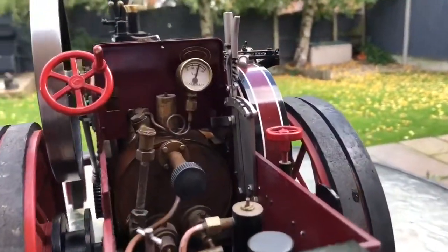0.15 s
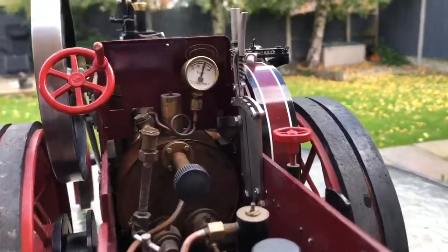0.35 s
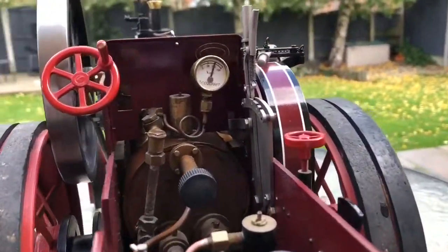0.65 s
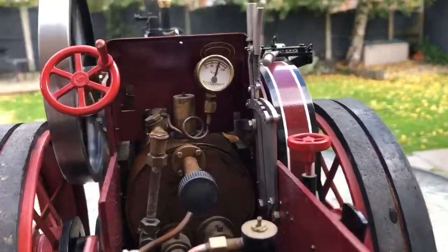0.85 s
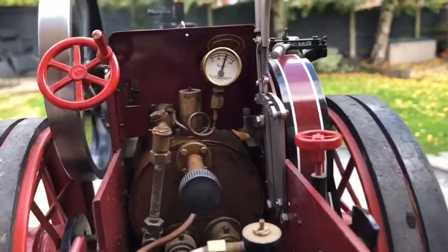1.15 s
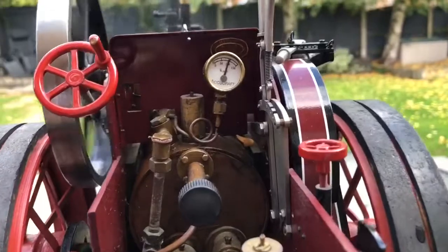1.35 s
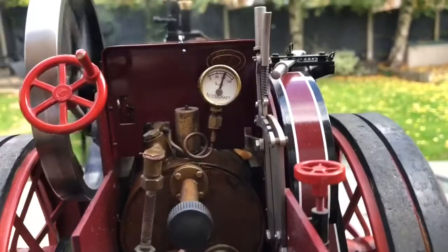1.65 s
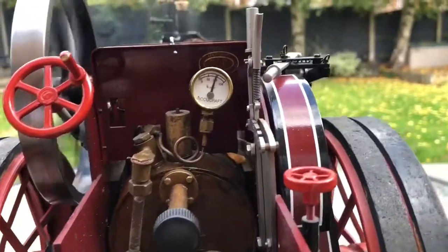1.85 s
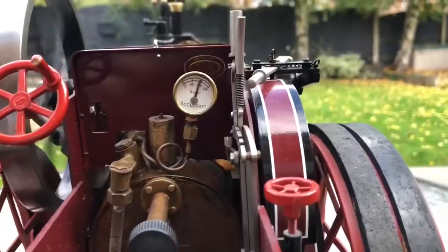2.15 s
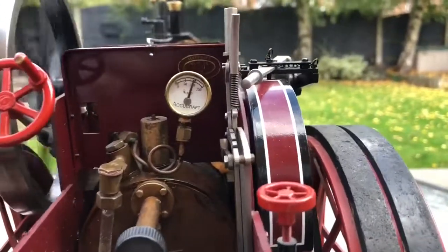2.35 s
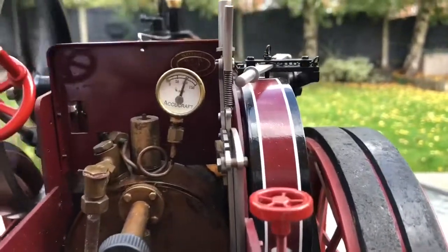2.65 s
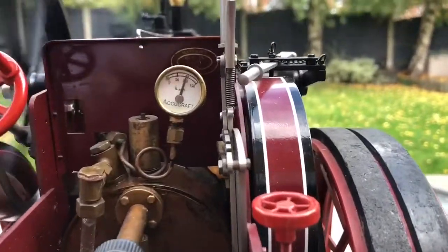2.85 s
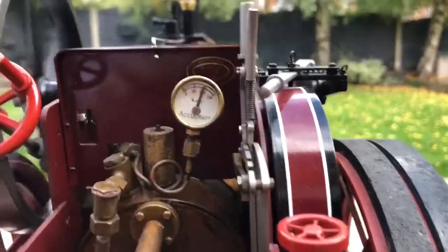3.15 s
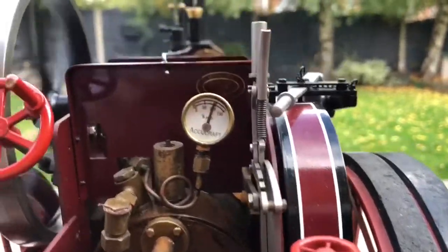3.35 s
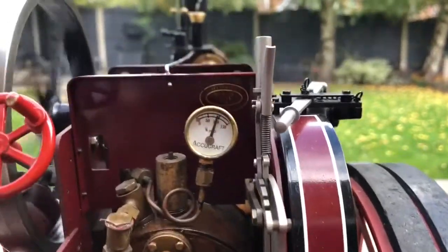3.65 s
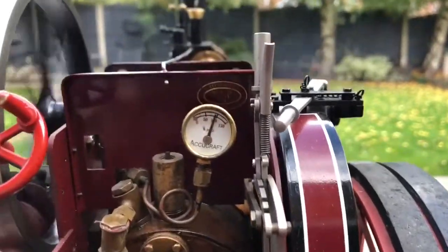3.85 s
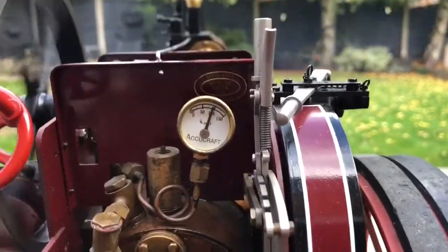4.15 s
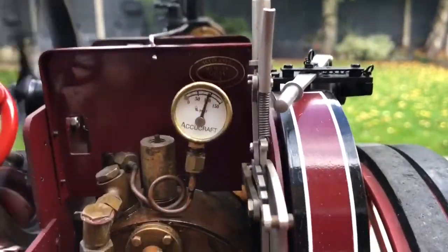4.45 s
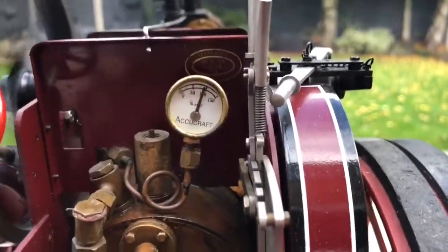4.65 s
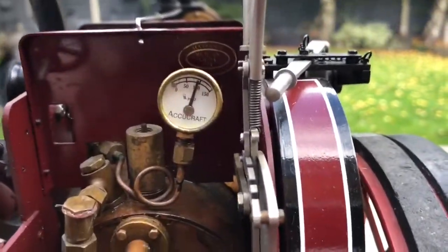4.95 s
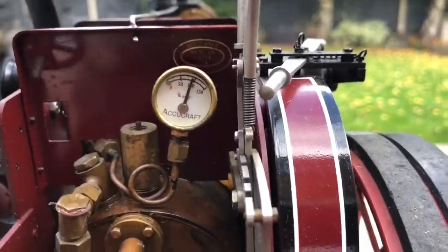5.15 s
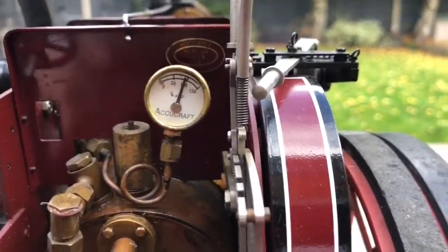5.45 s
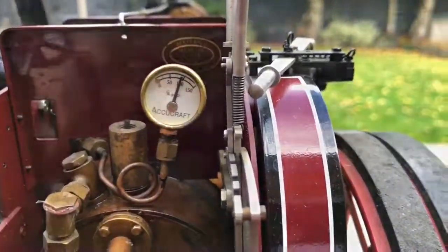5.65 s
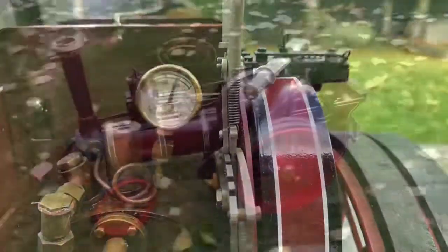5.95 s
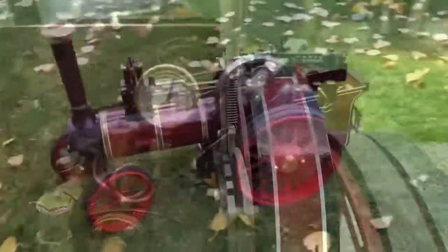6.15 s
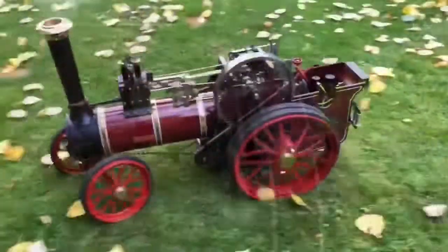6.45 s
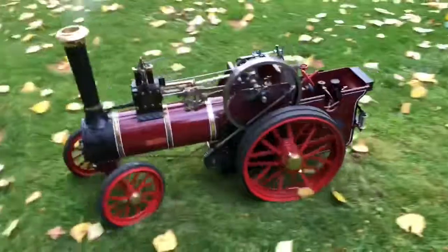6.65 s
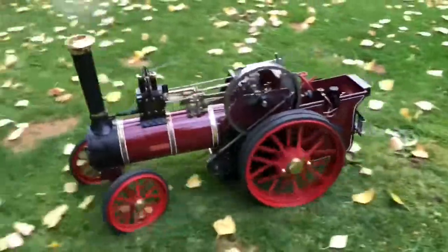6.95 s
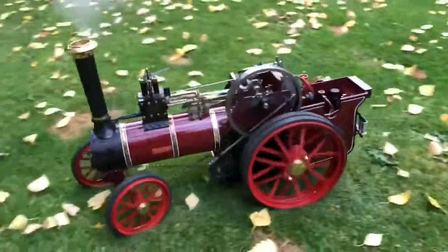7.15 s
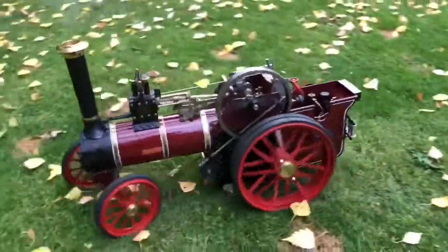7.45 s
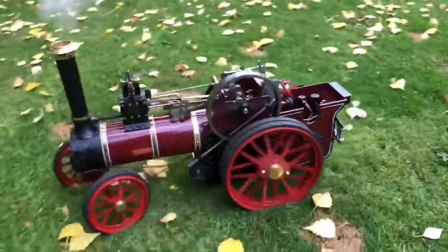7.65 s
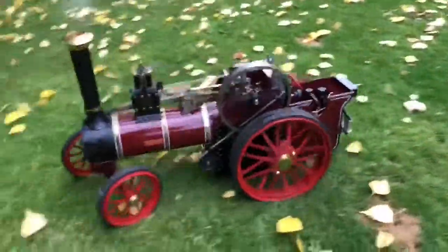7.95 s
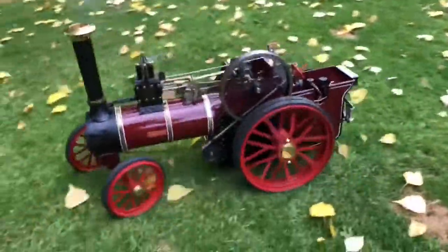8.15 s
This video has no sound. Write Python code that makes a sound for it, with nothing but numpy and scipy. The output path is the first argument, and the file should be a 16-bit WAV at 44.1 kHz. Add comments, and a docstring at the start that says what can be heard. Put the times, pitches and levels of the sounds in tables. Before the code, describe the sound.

Loud steam hiss and low burner roar with a quick metallic knock each turn, then crossfading to fast, even chuffing with light gear clatter outdoors.

```python
"""In a garden, a model steam traction engine is heard from close behind the footplate, then a few steps away.
Close up, shaped noise makes the loud steam hiss and the burner's roar, and the crank knocks once a turn.
This gives way to the engine driving: gated noise puffs four exhaust beats a turn over a light gear clatter.
Knocks are chirped clicks, clanks are damped pings that ring the frame; a faint drone and hum lie beneath."""
import sys
import numpy as np
from scipy import signal
from scipy.fft import rfft, irfft
from scipy.io import wavfile
from scipy.ndimage import uniform_filter1d

SR = 44100
rng = np.random.default_rng(int(sys.argv[2]) if len(sys.argv) > 2 else 0)


def put_to_file(sound):
    """Save the sound as 16-bit audio at rate SR, in the file named by the first command-line argument."""
    columns = np.atleast_2d(sound).T  # one column per channel
    safe = np.clip(columns, -1, 1)
    whole_steps = np.round(safe * 32767)
    wavfile.write(sys.argv[1], SR, whole_steps.astype(np.int16))


N = 366030
TIME = np.arange(N) / SR
FRAME_S = np.arange(N // 256 + 5) * 256 / SR  # times of the noise frames
BIN_HZ = np.fft.rfftfreq(1024, 1 / SR)
EDGE_HZ = 15790  # upper band limit
FIRST_KNOCK_S, FIRST_BEAT_S = .1178, 6.2973

# Levels in the tables are relative: each source adds its own trim.
# crossfade from standing to driving: start_s, end_s
CHANGE = (5.7, 6.59)
# how far the listener leans in over the footplate: time_s, lean_0_to_1
LEAN_IN = [(0, 0.04), (1, 0.07), (2.4, 0.11), (3.1, 0.44), (3.6, 0.7), (4.3, 0.88), (5.5, 1.0)]

# low garden drone: frequency_hz, density_db (per Hz)
GARDEN_COLOUR = [(20, -42), (40, -41), (62, -8), (72, -5), (95, -2), (125, -16.5), (160, 2.5), (220, -7),
                 (400, -17.5), (1000, -9.5), (2000, -11), (5000, -9.5), (15000, -52)]
# faint low hum that comes and goes: time_s, level_db
HUM_LEVEL = [(0, -50.5), (2.6, -52), (3.7, -54), (3.95, -41.5), (4.2, -56), (6, -54), (7.3, -59),
             (7.75, -48), (8.3, -66)]
# resonances of chimney and flue: centre_hz, width_hz, standing_db, driving_db
PIPE_RESONANCES = [(404, 47, -52, -66), (495.5, 19, -56, -51.5), (683.5, 9.2, -54.5, -50),
                   (1093, 57, -53, -52.5)]

# burner strength: time_s, level_db
BURNER_LEVEL = [(0, -41.5), (1.5, -38), (3.9, -36.5), (4.7, -36), (5.7, -36), (6.3, -43.5)]
# burner roar: frequency_hz, density_db (per Hz)
BURNER_COLOUR = [(40, -34), (110, -5.5), (138, -27), (158, -4.5), (180, -0.5), (215, 1.5), (290, -2.5),
                 (350, -9), (550, -11.5), (640, -22), (900, -6), (1200, -25.5), (1600, -28), (3000, -45)]

# steam jet strength: time_s, body_db, sizzle_db
JET_LEVEL = [(0, -26.5, -21.5), (1.35, -23, -21.5), (2.3, -22, -21.5), (3.1, -20.5, -21),
             (3.66, -20.5, -19.3), (4.58, -19, -18.5), (4.83, -19.5, -19.5), (5.49, -19.5, -17),
             (6.04, -22.5, -23), (6.2, -25, -27)]
# jet from behind the engine: frequency_hz, density_db (per Hz)
JET_COLOUR_BACK = [(250, -58), (700, -36), (1500, -22), (2100, -29), (2600, -17), (3600, -15), (4500, -13),
                   (5600, -10), (6800, -7), (9000, -11), (11000, -13), (13000, -9), (14500, -9),
                   (15600, -2)]
# jet from over the footplate: frequency_hz, density_db (per Hz)
JET_COLOUR_CLOSE = [(250, -65), (700, -21), (1500, -24.5), (2150, -25.5), (2600, -14.5), (3500, -20),
                    (4400, -8), (5600, -12), (6800, -10), (9000, -11), (11000, -9), (13000, -9),
                    (14500, -9), (15600, -4.5)]
# peaks and hollows from echoes among the plates, heard from behind: centre_hz, width_hz, gain_db
PLATE_ECHO_BACK = [(2130, 90, -13), (4070, 140, 5), (4590, 80, 0), (5090, 120, -7), (5500, 160, 6),
                   (7100, 160, -5), (7300, 250, -2), (8600, 210, -16), (10200, 190, -11), (13450, 130, -1),
                   (14600, 110, -6), (15600, 200, -3)]
# the same, part way in: centre_hz, width_hz, gain_db
PLATE_ECHO_MID = [(4100, 103, -30), (4500, 110, -5), (7830, 105, 5), (7830, 230, 0), (9900, 250, -2.5),
                  (11100, 140, -3), (11900, 280, 2), (12600, 160, -10), (13600, 170, -8), (14100, 250, 4),
                  (14700, 130, -7), (15550, 170, -3)]
# the same, over the footplate: centre_hz, width_hz, gain_db
PLATE_ECHO_CLOSE = [(3520, 150, -2.5), (4870, 230, 4), (5700, 110, 1), (5700, 200, 4), (7170, 160, -4.5),
                    (7640, 210, 1.5), (9570, 120, -6), (10400, 220, 0.5), (12200, 190, -1), (13850, 250, 2),
                    (13650, 230, 8), (13840, 68, -7), (14700, 120, 0), (14700, 110, -7), (15000, 120, 11)]

# ringing of boiler and frame after a blow: pitch_hz, level_db, t60_s
FRAME_MODES = [(436, -27, 0.1), (504, -23, 0.056), (670, -24.5, 0.083), (914, -15.5, 0.029),
               (1082, -25.5, 0.055), (1330, -50, 0.023), (1670, -31, 0.035), (1992, -26, 0.04)]
# louder clanks while driving, the first landing on a crank knock at 6.36 s: start_s, level_db, pitch_hz
GEAR_CLANKS = [(6.36, -23, 1070), (6.436, -29, 681), (6.785, -21.5, 1184), (6.991, -26, 685),
               (7.019, -25, 1130), (7.094, -28, 692), (7.209, -27, 1100), (7.253, -27, 570),
               (7.386, -27, 1110), (7.734, -26, 1130), (8.039, -25, 660), (8.069, -25.5, 690),
               (8.222, -24, 1650)]

# crank speed standing, easing off a little: time_s, speed_turns_per_s
STANDING_SPEED = [(2.22, 6.4745), (5.52, 6.325), (5.68, 6.338)]
# knock strength: time_s, level_db
KNOCK_STRENGTH = [(0, -17.5), (3.3, -14.5), (5.6, -15), (6.4, -21)]
# main knock from behind: frequency_hz, density_db (per Hz)
KNOCK_COLOUR_BACK = [(600, -15), (850, -18), (1030, 0), (1400, -15.5), (1900, -11.5), (2400, -16),
                     (2700, 1), (2950, 6), (3250, -15), (3700, -0.5), (5500, -34)]
# main knock from close: frequency_hz, density_db (per Hz)
KNOCK_COLOUR_CLOSE = [(600, 2), (850, -2.5), (1030, 5.5), (1400, -20), (1850, 1), (2400, 2.5), (2700, 10.5),
                      (2950, -11.5), (3250, 3.5), (3700, -16), (5500, -15)]
# lesser blows of a turn as play in the rods is taken up:
# after_knock_s, pitch_hz, t60_s, level_db, extra_db (when leaning in), scatter_s
ROD_BLOWS = [(-.048, 560, 0.022, -15.5, 2.5, 0.00087), (-.044, 1410, 0.056, -15.5, -21, 0.003),
             (-.0375, 1110, 0.012, -6.5, 3, 0.00046), (-.036, 414, 0.022, -10, -3, 0.00278),
             (-.037, 2740, 0.0069, -2, 1.5, 0.00053), (-.030, 1080, 0.014, -7.5, -0.5, 0.000964),
             (.005, 2780, .005, 2.5, 1, 0.00019), (0.0107, 495, 0.017, -6, -0.5, 0.00116),
             (.066, 1280, 0.023, -15.5, -1, 0.00067)]

# crank speed driving over the uneven lawn: time_s, speed_turns_per_s
DRIVING_SPEED = [(6.43, 4.467), (6.73, 4.55), (6.99, 5.053), (7.09, 4.456), (7.55, 4.873), (8.21, 4.409)]
# where in the turn each exhaust beat starts, slightly limping: place_turns
VALVE_PLACES = [0, .239, .5, .739]
# four exhaust beats of a turn, strong and weak by turns: level_db, swell_db (through the beat), leak_db (after it)
EXHAUST_BEATS = [(-25.5, -1.5, -38), (-27.5, -2.5, -42.5), (-26, -1.3, -40), (-27, -3, -43)]
# chimney exhaust: frequency_hz, density_db (per Hz)
EXHAUST_COLOUR = [(300, -9), (900, -12), (1130, -4.5), (1500, -11), (1850, -11.5), (2130, -24), (2420, 2.5),
                  (2650, -2), (2980, -7), (3550, -1), (4200, -1.5), (4900, -1), (7000, -2.5), (9500, -5),
                  (12500, -9), (15500, -9)]
# peaks and hollows from the chimney bore: centre_hz, width_hz, gain_db
CHIMNEY_BORE = [(2070, 100, -7), (2890, 100, -15), (4720, 130, -4.5), (4950, 180, 4), (5400, 200, -0.5),
                (6700, 260, 3), (7300, 180, -1), (8130, 300, 2.5), (8900, 200, -2), (9300, 230, 3),
                (10300, 260, -3.5), (11340, 230, 3.5), (11600, 200, -9), (12650, 250, -1), (14700, 250, 7)]


def gain(db):
    """Decibels to gain."""
    return 10 ** (np.asarray(db) / 20)


def evened(x):
    """Scales to rms 1."""
    return x / np.sqrt(np.mean(x ** 2) + 1e-20)


def curve(rows, s, column=1):
    """One column of a table, interpolated at the times s."""
    rows = np.array(rows)
    return np.interp(s, rows[:, 0], rows[:, column])


def colour(points):
    """A spectrum in dB on the bins, interpolated over log frequency."""
    hz, db = np.transpose(points)
    return np.interp(np.log(BIN_HZ + 1), np.log(hz), db)


def echoes(bumps, stretch=1.0):
    """Peaks and hollows in dB on the bins; they slide down as the echo paths stretch."""
    return sum(db * np.exp(-((BIN_HZ * stretch - hz) / width) ** 2) for hz, width, db in bumps)


def add(mix, s, sound):
    """Mixes a sound in at time s."""
    part = mix[max(round(s * SR), 0):][:len(sound)]
    part += sound[:len(part)]


def wander(rate_hz):
    """Smooth random motion of rms 1: noise with a Gaussian roll-off around a rate."""
    hz = np.fft.rfftfreq(N, 1 / SR)
    spectrum = rfft(rng.standard_normal(N))
    return evened(irfft(spectrum * np.exp(-(hz / rate_hz) ** 2), N))


def noise(field_db, patchy_db):
    """Turbulent noise of rms 1 with a given colour and short-lived patches."""
    real, imaginary, patches = rng.standard_normal((3, len(FRAME_S), len(BIN_HZ)))
    patches = uniform_filter1d(patches, size=8, axis=0)
    patches = evened(uniform_filter1d(patches, size=10, axis=1))
    spectra = (real + 1j * imaginary) * gain(field_db + patchy_db * patches)
    sound = signal.istft(spectra.T, nperseg=1024, noverlap=768)[1]
    return evened(sound[:N])


def ping(hz, t60, rise_s=0.00046):
    """A short blow: a damped swing with a soft start and no net push of air."""
    t = TIME[:SR // 10]
    start = (1 - np.exp(-t / rise_s)) ** 2
    decay = np.exp(-np.log(1000) * t / t60)
    swing = np.cos(2 * np.pi * hz * t) * start * decay
    return np.gradient(swing) * SR / (2 * np.pi * hz)


def frame_ring(blows):
    """Boiler and frame ring on in their damped modes after a train of blows."""
    ringing = sum(gain(db) * ping(hz, t60) for hz, db, t60 in FRAME_MODES)
    return signal.oaconvolve(blows, ringing)[:N]


def scatter(x, t60, wet_db):
    """Adds a short spray of echoes from nearby metal."""
    t = TIME[:SR // 8]
    envelope = (1 - np.exp(-t / 0.0076)) * np.exp(-np.log(1000) * t / t60)
    tail = rng.standard_normal(len(t)) * envelope
    return x + gain(wet_db) * signal.oaconvolve(x, tail / np.linalg.norm(tail))[:N]


def crank_times(speed, first_s, places, end_s):
    """The moments at which the turning crank passes the given places in each turn."""
    turns = np.cumsum(curve(speed, TIME)) / SR
    turns = turns - np.interp(first_s, TIME, turns)
    passes = (np.arange(int(turns[-1]) + 1)[:, None] + places).ravel()
    passes = passes[passes < np.interp(end_s, TIME, turns)]
    return np.interp(passes, turns, TIME)


def garden(level_db=-41.0, hum_hz=81.5, waver_hz=3.06):
    """Steady outdoor drone of coloured noise, with a hum that wavers in pitch and level."""
    phase_turns = np.cumsum(hum_hz + waver_hz * wander(rate_hz=6.2)) / SR
    hum_gain = gain(curve(HUM_LEVEL, TIME) + 2.0 * wander(rate_hz=6.6))
    hum = hum_gain * np.sin(2 * np.pi * phase_turns)
    return gain(level_db) * noise(colour(GARDEN_COLOUR), patchy_db=-0.5) + hum


def draught(away):
    """Air drawn through flue and chimney keeps their resonances ringing: narrow bands of noise."""
    hz, out = np.fft.rfftfreq(N, 1 / SR), np.zeros(N)
    for centre, width, standing_db, driving_db in PIPE_RESONANCES:
        resonance = 1 / (1 + ((hz - centre) / (0.5 * width)) ** 2)
        tone = evened(irfft(rfft(rng.standard_normal(N)) * resonance, N))
        out += tone * gain(standing_db + away * (driving_db - standing_db))
    return out


def burner(trim_db=1.8, flutter_db=1.0):
    """The flame roars in the flue: low coloured noise with a fluttering level."""
    fade = np.clip((CHANGE[1] - TIME) / 0.3, 0, 1)
    level_db = curve(BURNER_LEVEL, TIME) + trim_db + flutter_db * wander(rate_hz=17)
    return gain(level_db) * noise(colour(BURNER_COLOUR), patchy_db=-1.0) * fade


def steam_jet(flutter_db=0.5, split_hz=11300, fade_s=0.36):
    """Escaping steam as noise; its echo pattern changes as the listener leans in and sways."""
    lean = np.clip(curve(LEAN_IN, FRAME_S), 0, 1)[:, None]
    back = np.clip(1 - lean / 0.17, 0, 1)
    close = np.clip((lean - .4) / 0.45, 0, 1)
    sway = 1 + .004 * np.interp(FRAME_S, TIME, wander(rate_hz=1))[:, None]
    field = (1 - lean) * colour(JET_COLOUR_BACK) + lean * colour(JET_COLOUR_CLOSE)
    field = field + back * echoes(PLATE_ECHO_BACK, sway) + close * echoes(PLATE_ECHO_CLOSE, sway)
    field = field + (1 - back - close) * echoes(PLATE_ECHO_MID, sway + 0.021 * (lean - .3))

    # a fine random ripple drifts slowly through the hiss
    ripple = uniform_filter1d(rng.standard_normal(field.shape), size=80, axis=0)
    ripple = uniform_filter1d(ripple, size=4, axis=1)
    field = field + 1.5 * evened(ripple)

    # body and sizzle each follow their own level, blended around the split
    top = BIN_HZ > split_hz
    power = gain(field) ** 2
    body_power = power[:, ~top].sum(1)
    sizzle_power = power[:, top & (BIN_HZ < EDGE_HZ)].sum(1)
    body_db = curve(JET_LEVEL, FRAME_S) - 10 * np.log10(body_power)
    sizzle_db = curve(JET_LEVEL, FRAME_S, column=2) - 10 * np.log10(sizzle_power)
    share = .5 + .5 * np.tanh((BIN_HZ - split_hz) / 1200)
    field = field + (1 - share) * body_db[:, None] + share * sizzle_db[:, None]

    level = np.sqrt((gain(field) ** 2).sum(1).mean())  # noise() comes at rms 1
    flutter = gain(flutter_db * wander(rate_hz=49))
    fade = np.clip((CHANGE[1] - TIME) / fade_s, 0, 1)
    return level * noise(field, patchy_db=0.5) * flutter * fade


def gears(clank_db=3.5, rattle_db=-40, per_s=110, spread_db=4.0, ring_db=4.0):
    """Loose gear teeth rattle at random, with a few harder clanks; all of them ring the frame."""
    out, blows = np.zeros(N), np.zeros(N)
    for s, db, hz in GEAR_CLANKS:
        add(out, s, gain(db + clank_db) * ping(hz, t60=.015))
        add(blows, s, [gain(db + clank_db + 1.5)])
    span_s = TIME[-1] - CHANGE[0]
    for when, pitch, hard in rng.random((int(per_s * span_s), 3)):
        s = CHANGE[0] + when * span_s
        size = gain(rattle_db + spread_db * min(-np.log(hard), 2.5))
        add(out, s, size * ping(260 * 7.5 ** pitch, t60=0.03))  # 260 to 1950 Hz
        add(blows, s, [size])
    return scatter(out + gain(ring_db) * frame_ring(blows), t60=0.071, wet_db=-5)


def knocks(uneven_db=0.5):
    """One knock a turn while the engine stands: rows of start_s, level_db."""
    times = crank_times(STANDING_SPEED, FIRST_KNOCK_S, [0], CHANGE[1])
    level_db = curve(KNOCK_STRENGTH, times) + uneven_db * rng.standard_normal(len(times))
    return list(zip(times, level_db))


def puffs(turns, level_db=-41.5, before_s=0.031, length_s=0.023):
    """A soft puff of exhaust comes just ahead of each knock: swells of patchy noise."""
    swell = sum(gain(db + 15) * np.exp(-((FRAME_S - s + before_s) / length_s) ** 2) for s, db in turns)
    puff_colour = colour([(150, -35), (430, -5), (620, 2), (800, -2), (1100, -8),
                          (1380, 7), (1550, -7), (4000, -22), (9000, -50)])
    return gain(level_db) * np.interp(TIME, FRAME_S, swell) * noise(puff_colour, patchy_db=3.5)


def knock(lean, travel=.0018, uneven_db=3.5):
    """A click of peak 1 that crosses the frame as a bending wave: the treble arrives first."""
    db = (1 - lean) * colour(KNOCK_COLOUR_BACK) + lean * colour(KNOCK_COLOUR_CLOSE)
    db = db + uneven_db * evened(uniform_filter1d(rng.standard_normal(len(BIN_HZ)), size=10))
    delay_s = travel * 2800 / np.maximum(BIN_HZ, 600)
    phase = 2 * np.pi * np.cumsum(delay_s) * BIN_HZ[1]  # delay summed over the bins
    band = np.clip(BIN_HZ / 500, 0, 1) ** 3 / (1 + (BIN_HZ / 6000) ** 4)
    click = irfft(gain(db) * band * np.exp(-1j * phase))
    click = np.roll(click, SR // 200)  # leaves a short run-in
    return click / abs(click).max()


def crank(turns, knock_db=1.5, blows_db=3.5, uneven_db=0.64, detune=0.048, ring_db=5.0):
    """Every turn repeats the same knock and run of lesser blows, never quite alike."""
    out, blows = np.zeros(N), np.zeros(N)
    chance = rng.standard_normal((len(turns), len(ROD_BLOWS), 3))
    for (s, db), draws in zip(turns, chance):
        lean = curve(LEAN_IN, s)
        add(out, s - .0056, gain(db + knock_db) * knock(lean))  # early by the run-in
        for (after, hz, t60, blow_db, lean_db, loose), (late, hard, sharp) in zip(ROD_BLOWS, draws):
            start_s = s + after + loose * late
            size = gain(db + blows_db + blow_db + lean * lean_db + uneven_db * hard)
            add(out, start_s, size * ping(hz * (1 + detune * sharp), t60))
            add(blows, start_s, [size * (hz < 1500)])  # only the low-pitched blows shake the frame
    return scatter(out + gain(ring_db) * frame_ring(blows), t60=.06, wet_db=-9)


def beats(fall_db_per_s=0.95, effort_db=0.5, uneven_db=.5):
    """Beats harder at speed, fainter as the engine draws away: start_s, level_db, swell_db, leak_db."""
    times = crank_times(DRIVING_SPEED, FIRST_BEAT_S, VALVE_PLACES, TIME[-1])
    order = np.arange(len(times)) % len(EXHAUST_BEATS)
    db, swell_db, leak_db = np.array(EXHAUST_BEATS)[order].T
    speed = curve(DRIVING_SPEED, times)
    db = db + effort_db * (speed - speed.mean()) - fall_db_per_s * (times - times.mean())
    return list(zip(times, db + uneven_db * rng.standard_normal(len(times)), swell_db, leak_db))


def exhaust(trim_db=1.65, lead_s=0.0052, rise_s=0.0064, shut_s=0.0098, close_s=0.0084, flutter_db=1.3):
    """The valve opens sharply for each beat and shuts just before the next, leaking a little in between."""
    flow, chuffs = np.zeros(N), beats()
    starts = [row[0] for row in chuffs]
    lengths = np.diff(starts + [starts[-1] + .055])
    for (s, db, swell_db, leak_db), length in zip(chuffs, lengths):
        t = np.arange(0, length, 1 / SR)
        opening = np.clip(t / rise_s, 0, 1)
        closing = np.clip((length + lead_s - shut_s - t) / close_s, 0, 1)  # 1 open, 0 shut
        blast = gain(db + swell_db * np.clip(1.8 * t / length - .5, 0, 1))
        leak = gain(leak_db - 3.0)
        add(flow, s - lead_s, opening * (closing * blast + (1 - closing) * leak))
    spit = gain(flutter_db * wander(rate_hz=250))  # wet steam leaves unevenly
    steam = noise(colour(EXHAUST_COLOUR) + echoes(CHIMNEY_BORE), patchy_db=1.)
    return gain(trim_db) * flow * spit * steam


def scene():
    """The standing engine gives way to the driving one; both channels are alike."""
    away = np.clip((TIME - CHANGE[0]) / (CHANGE[1] - CHANGE[0]), 0, 1)
    turns = knocks()
    standing = steam_jet() + burner() + (crank(turns) + puffs(turns)) * gain(-4 * away)
    exhaust_fade = np.clip((TIME - 6.1) / 0.48, 0, 1)
    driving = exhaust_fade * exhaust() + np.sqrt(away) * gears()
    mono = standing + driving + draught(away) + garden()
    return np.array([mono, mono])


def record(dry, bass_cut_hz=45):
    """The microphone's bass cut, then a steep upper band limit."""
    bass_cut = signal.butter(3, bass_cut_hz, "high", fs=SR, output="sos")
    thin = signal.sosfilt(bass_cut, dry)
    band_limit = signal.firwin(1023, EDGE_HZ, window=("kaiser", 9), fs=SR)
    return signal.oaconvolve(thin, band_limit[None], "same", axes=1)


dry = scene()
out = record(dry)
put_to_file(out)
```